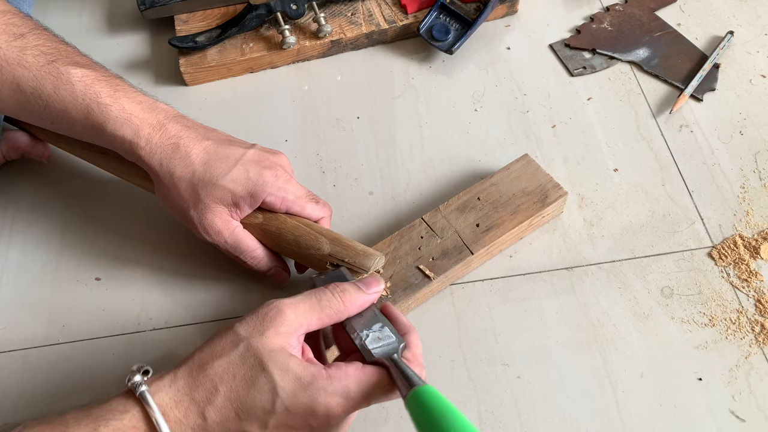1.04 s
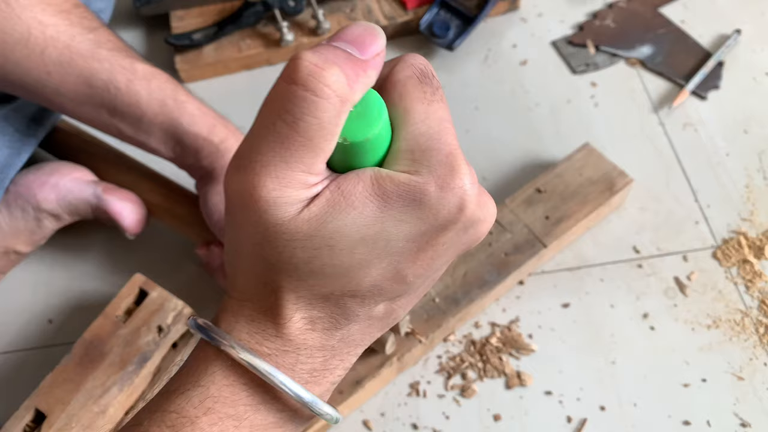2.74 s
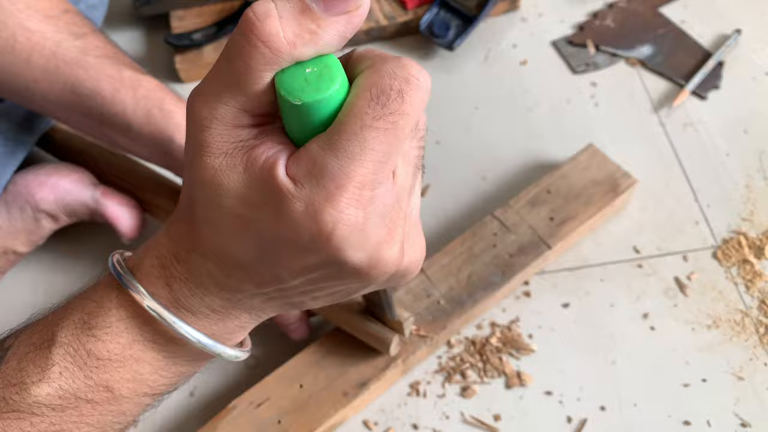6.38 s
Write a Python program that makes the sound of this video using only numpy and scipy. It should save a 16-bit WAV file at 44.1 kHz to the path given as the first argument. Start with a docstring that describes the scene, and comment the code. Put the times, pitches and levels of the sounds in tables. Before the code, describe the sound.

Light taps of a blade on wood lead to six crisp chisel cuts, with soft scraping and short high squeaks between them.

```python
"""A chisel cuts down through the edge of a wooden block on a board on a hard floor, in a small room.
First the edge ticks on the wood as it is set in place, over soft hiss and very faint chirping; a low
room noise comes up and the block rocks with a hollow knock. From 3.2 s come six cuts: a brief rush of
noise, a crack, the blade hitting the board, and a sharp second tick about 60 ms later. Between and after
the cuts the blade rubs, and a thin, rough whine comes and goes in snatches, with short high squeaks."""
import sys
import numpy as np
from scipy import signal
from scipy.fft import rfft, irfft
from scipy.io import wavfile
from scipy.ndimage import uniform_filter1d

SR = 44100
rng = np.random.default_rng(int(sys.argv[2]) if len(sys.argv) > 2 else 0)


def wav_out(sig):
    """Save sig, one row per channel (or a flat mono array), as 16-bit PCM at SR to the path in sys.argv[1]."""
    wavfile.write(sys.argv[1], SR, np.round(np.clip(np.atleast_2d(sig).T, -1, 1) * 32767).astype(np.int16))


N = 315756
TIME = np.arange(N) / SR
BRIEF = np.arange(-1024, 1024) / SR   # time axis centred on a transient [s]

# cue list of the cuts: (time [s], blow [dB], crack [dB], rush [dB], rush lead [s], 3 kHz bark [dB],
# 4 kHz splintering [dB], brittle treble [dB], thump [dB], rub [dB], wood ring [dB])
CUT_CUES = [(3.229, -6, -4, -31.5, 0.0036, -3, -0.5, -1, -47.5, -66.5, -34.5),
            (4.2034, -9, -7.5, -29, .0065, -14, -3.5, 6.5, -52, -77, -40),
            (4.8303, -9.5, -13.5, -28, 0.0041, 1.5, 2.5, 6.5, -67.5, -70.5, -38),
            (5.4783, -11, -12, -26, 0.0073, -2, 4.5, -2.5, -66, -53.5, -37.5),
            (6.078, -6, -7.5, -26, .0072, -4, -2.5, 4, -48, -53.5, -37),
            (6.5730, -8.5, -15, -29.5, 0.0074, 4, 3, 4.5, -69, -75.5, -38.5)]
# EQ of the rush of noise and of the crack after it: (frequency [Hz], level [dB])
RUSH_EQ = [(100, -36), (600, -16), (1300, 1), (2100, 2.5), (2900, 0.5), (5000, 3.5), (7900, -1), (9400, 6),
           (10700, -7), (12000, -4.5), (16000, -13)]
CRACK_EQ = [(300, -15.5), (1500, -5.5), (2200, -3), (2800, 3), (3900, -8.5), (5200, -5), (6100, -6),
            (7000, -9.5), (8700, -6), (10500, -20), (16000, -19.5)]
# modes of the chisel snapping free: (frequency [Hz], level [dB], t60 [s])
CHISEL_MODES = [(3200, -20.5, 0.012), (5140, -0.5, 0.0048), (6850, -0.5, 0.0061), (8400, -21.5, 0.012),
                (11400, -16.5, 0.015)]

def cuts(blow_hz, blow_s, crack_lead_s):
    """After a brief, bright rush of noise the wood cracks and jolts the chisel, which hits the board."""
    out = np.zeros(N)
    blow = -np.cos(2 * np.pi * blow_hz * BRIEF) * np.exp(-(BRIEF / blow_s) ** 2)
    for s, blow_db, crack_db, rush_db, rush_lead_s, bark_db, splinter_db, brittle_db, *_ in CUT_CUES:
        start = s + BRIEF[0]
        tone = [(1700, 0), (2900, bark_db), (4000, splinter_db), (6000, 0), (13000, brittle_db)]
        rush = colour(burst(RUSH_EQ, rise_s=0.0018, fall_s=0.0053, spread_db=4.0), tone)
        crack = colour(burst(CRACK_EQ, rise_s=0.00038, fall_s=0.00062), tone)
        jolt = touched(CHISEL_MODES, detune=0.004, uneven_db=4.0)
        add(out, start - rush_lead_s, from_db(rush_db + 0.5) * rush)
        add(out, start - crack_lead_s, from_db(crack_db - 2.5) * crack)
        add(out, s - crack_lead_s, from_db(crack_db - 4.5) * jolt)
        add(out, start, from_db(blow_db) * blow)
    return out


# modes of block and board: (frequency [Hz], level [dB], t60 before damping [s])
WOOD_MODES = [(229.5, -2, .14), (310, -0.5, .11), (346.3, 2.5, 0.13), (408.5, -2.5, 0.13), (550, -2, 0.17),
              (630, -5, 0.071), (691.4, 0, 0.17), (756, 3.5, 0.16), (829, 0, .16), (984, 1, 0.16),
              (1117, 0.5, .08), (1265, 7, 0.11), (1328, 5, .08), (1439, 1, 0.033), (1535, 4.5, .11),
              (1634, 4.5, .11), (1720, 5, 0.067), (1986, -2.5, .1), (2100, -5, .08), (2830, 1, .07),
              (3000, -1.5, 0.063), (5420, -3.5, .05)]

def wood_ring(uneven_db, t60_share):
    """Every blow rings the same modes in a new balance; the weight on the block damps them."""
    times, *_, ring_db = np.transpose(CUT_CUES)
    hits = np.round(times * SR).astype(int)
    out = np.zeros(N)
    for k, (hz, mode_db, t60) in enumerate(WOOD_MODES):
        force = np.zeros(N)
        force[hits] = from_db(ring_db + mode_db + uneven_db * rng.standard_normal(len(hits)))
        out += (-1) ** k * ring(force, hz, t60_share * t60)
    return out


def thumps(thump_s):
    """A very faint, deep thump under each cut."""
    out = np.zeros(N)
    for s, *_, thump_db, _, _ in CUT_CUES:
        add(out, s + BRIEF[0], -from_db(thump_db) * np.exp(-(BRIEF / thump_s) ** 2))
    return out


# what follows each blow: (delay [s], tick [dB], treble [dB], note [Hz], note [dB], crackle [dB])
SECOND_TICK_CUES = [(.0640, -34, -15.5, 3060, -42, -42), (.067, -37.5, -3, 8000, -55, -38),
                    (0.061, -43.5, -9, 7300, -59, -45.5), (.0600, -29.5, 7.5, 7000, -41, -56),
                    (.0575, -31.5, 7, 6900, -40.5, -56), (.0690, -39, 5, 14700, -42, -56)]
# EQ of the crackle and of the second tick: (frequency [Hz], level [dB])
CRACKLE_EQ = [(500, -25), (2000, -1.5), (5500, 0.5), (9500, -3.5), (16000, -10)]
SECOND_TICK_EQ = [(100, -37), (450, -8.5), (750, -15.5), (1300, -2), (2000, -5.5), (2700, -4), (4000, -7.5),
                  (5000, -3), (6000, -7.5), (7000, 1.5), (8000, -7), (14000, -16.5), (15400, -3)]

def second_ticks(snaps_per_s, crackle_fade_s, t60_s):
    """Each blow trails a short crackle; about 60 ms after it comes a sharp tick with a brief ring."""
    out, t = np.zeros(N), TIME[:SR // 8]
    for (s, *_), (delay_s, db, treble_db, hz, note_db, crackle_db) in zip(CUT_CUES, SECOND_TICK_CUES):
        snaps = rng.standard_normal(len(t)) * (rng.random(len(t)) < snaps_per_s / SR)
        crackle = rms_one(colour(snaps, CRACKLE_EQ)) * np.exp(-t / crackle_fade_s)
        tick = contact(SECOND_TICK_EQ, treble_db, graze_db=-29.5, rise_s=0.0003, fall_s=0.0058)
        note = narrow_noise(len(t), hz, width_hz=400) * from_db(-60 * t / t60_s)
        add(out, s, from_db(crackle_db) * crackle)
        add(out, s + delay_s + BRIEF[0], from_db(db) * tick)
        add(out, s + delay_s, from_db(note_db) * note)
    return out


# the block rocks on the board: (time [s], level [dB], hardness [dB/octave], attack [s])
KNOCK_CUES = [(2.0815, -30, 5, 0.0062), (3.2885, -30, 8, 0.013), (3.944, -47.5, -2.5, .004)]
# its hollow note, a beating pair with overtones: (frequency [Hz], level [dB], t60 [s])
HOLLOW_MODES = [(704, 3.5, 0.13), (719.6, 3, 0.07), (860, 6, 0.027), (1161, -12, 0.075), (1253, -14, .1),
                (1370, -14, 0.079), (1537, -20, 0.13), (2800, -31, 0.12), (3070, -25.5, 0.099)]

def knocks():
    """The block settles softly, so its note takes time to build; a harder knock is brighter."""
    out = np.zeros(N)
    root_hz = HOLLOW_MODES[0][0]
    for s, knock_db, hardness, attack_s in KNOCK_CUES:
        note = struck([(hz, db + hardness * np.log2(hz / root_hz), t60) for hz, db, t60 in HOLLOW_MODES])
        attack = 1 - np.exp(-TIME[:len(note)] / attack_s)
        add(out, s, from_db(knock_db) * note * attack)
    return out


# the edge touches the wood: (time [s], grit [dB], treble [dB], clink [dB], tap [dB], grit attack [s])
TICK_CUES = [(0.096, -53.5, -7, -83, -57.5, 0.0058), (.522, -30, -12, -48, -44.5, 0.00077),
             (0.675, -62, -6, -50, -83, 0.00091), (0.759, -53.5, 0, -69, -72, 0.0014),
             (0.814, -47, -18, -50.5, -64, 0.00082), (.997, -74, -12, -65, -71, .001),
             (1.063, -72, 5, -58, -83, 0.0011), (1.078, -47.5, -3.5, -47, -81, 0.0054),
             (1.082, -47.5, -1, -65, -76, 0.0014), (1.251, -51, 5, -46, -73, 0.0011),
             (1.272, -57, -4, -60, -78, .001), (1.577, -54.5, -15, -70, -64, 0.0014),
             (1.682, -45.5, 14, -81, -52, 0.0014), (1.937, -38.5, 17, -77, -48.5, 0.00029),
             (2.084, -44, -16, -50, -56, 0.0027), (2.395, -60, -12, -58, -75, .0019),
             (3.104, -49, 8.5, -59, -52.5, 0.0076), (4.007, -58.5, 8, -66, -76, 0.0011),
             (4.082, -56.5, 13.5, -73.5, -72, 0.0018), (4.426, -58, -7, -64.5, -70, 0.0031),
             (4.479, -54.5, 13, -79, -78, 0.0014), (4.5961, -32.5, 1, -73, -47.5, 0.0009),
             (4.647, -46, 8, -72, -62.5, 0.0014), (5.364, -33.5, 9, -55, -42, 0.002),
             (6.327, -60, -7.5, -64, -70, .002), (6.489, -32, 12.5, -55.5, -51, 0.0025),
             (6.539, -42, 13, -64, -59, 0.0014), (7.055, -44, 0, -64, -63, 0.0027),
             (7.065, -48, 2, -66, -64, 0.0027)]
# EQ of the grit: (frequency [Hz], level [dB])
GRIT_EQ = [(60, -46.5), (450, -3), (750, -1), (1200, 1), (1550, -1), (2100, 7), (3000, -7), (3900, 2),
           (4500, -3), (5600, 6), (8000, -11), (9500, 3), (11000, -10), (16000, -11.5)]
# modes of the woody tap and of the tool's clink: (frequency [Hz], level [dB], t60 [s])
TAP_MODES = [(774, -9, 0.052), (870, -8.5, 0.044), (1010, -5.5, 0.073), (1220, 2, 0.058), (1790, -5, 0.081),
             (1950, -6.5, 0.042), (2190, -1.5, 0.022), (3500, -8.5, .025), (4060, -5, .028),
             (5500, -1.5, 0.015), (6170, 1, 0.02), (8800, 1.5, .014)]
CLINK_MODES = [(3290, -4, 0.033), (3476, 6.5, .03), (3900, -3, .022), (4280, -4, 0.029), (4700, -3, 0.021),
               (5960, -1.5, 0.036), (6200, -16.5, .022), (6700, -4.5, 0.036), (7900, -14.5, 0.042)]

def ticks(delay_s, tap_trim_db, clink_trim_db, bounce_s, bounce_loss_db):
    """Each gritty touch taps the wood, and the tool chatters in three ever weaker bounces."""
    out = np.zeros(N)
    for cue_s, grit_db, treble_db, clink_db, tap_db, rise_s in TICK_CUES:
        s = cue_s + delay_s
        grit = contact(GRIT_EQ, treble_db, graze_db=-18.5, rise_s=rise_s, fall_s=0.0021)
        tap = touched(TAP_MODES, detune=0.021, uneven_db=1.5)
        add(out, s + BRIEF[0], from_db(grit_db) * grit)
        add(out, s, from_db(tap_db + tap_trim_db) * tap)
        for bounce in range(3):
            at_s = s + bounce_s * np.sqrt(bounce) * rng.uniform(.7, 1.3)
            clink = touched(CLINK_MODES, detune=.022, uneven_db=3.0)
            add(out, at_s, from_db(clink_db + clink_trim_db - bounce_loss_db * bounce) * clink)
    return out


# the blade slides over the wood: (time [s], length [s], level [dB])
SLIDE_CUES = [(1.825, 0.41, -82), (3.149, 0.019, -60), (4.743, 0.029, -67.5), (4.977, 0.04, -62),
              (5.147, 0.11, -62), (5.278, 0.013, -64), (5.315, 0.05, -66), (6.669, 0.17, -73.5),
              (6.954, 0.21, -64.5)]
# EQ of the friction: (frequency [Hz], level [dB])
RUB_EQ = [(1200, -19), (2200, -2), (3500, -2.5), (5500, -3), (8000, -6.5), (9600, -4), (11000, -11),
          (16000, -16.5)]

def rubbing(resting_db, push_s, let_go_s, slips_per_s, t60_s):
    """Clumps of tiny pitched slips swell as the hand leans into a cut and when the blade slides."""
    pushes = sum(from_db(db) * around(s, push_s, let_go_s) for s, *_, db, _ in CUT_CUES)
    friction = from_db(resting_db) + pushes
    for s, length_s, db in SLIDE_CUES:
        add(friction, s, from_db(db) * swell(round(length_s * SR), length_s / 2))
    slipping = rng.random(N) < slips_per_s * flutter(depth_db=5, rate_hz=40) / SR
    slips = slipping * rng.choice([-1, 1], N) * uneven_gains(N, spread_db=3)
    pitches = np.linspace(1800, 15500, 32)
    voice = rng.integers(0, len(pitches), N)
    grit = sum(ring(slips * (voice == k), hz, t60_s) * flutter(depth_db=4, rate_hz=25)
               for k, hz in enumerate(pitches))
    return friction * rms_one(colour(flatten(grit, bins=6000), RUB_EQ))


# spells of the whine: (time [s], length [s], level [dB])
WHINE_CUES = [(2.754, .1, -71), (2.884, 0.36, -71.5), (5.162, 0.15, -70.5), (5.528, 0.49, -63.5),
              (6.112, 0.208, -63), (6.397, 0.55, -70.5)]
# its narrow noise bands: (frequency [Hz], width [Hz], level [dB])
WHINE_BANDS = [(2770, 70, -4), (3095, 70, -6.5), (3350, 70, -7), (3714, 55, -6), (4027, 50, -8),
               (4220, 80, -6), (5000, 90, -8), (5520, 90, -5), (6724, 90, -13)]

def whine(bands_db, rasp_db, rasp_width_hz, fade_s):
    """A thin, rough whine comes and goes in snatches over a patchy rasp."""
    envelope = np.zeros(N)
    for s, length_s, db in WHINE_CUES:
        add(envelope, s, from_db(db) * swell(round(length_s * SR), fade_s))
    bands = sum(from_db(db) * narrow_noise(N, hz, width_hz) * flutter(depth_db=7, rate_hz=30)
                for hz, width_hz, db in WHINE_BANDS)
    rasp = sum(narrow_noise(N, hz, rasp_width_hz) * flutter(depth_db=6, rate_hz=25)
               for hz in np.geomspace(2500, 6200, 14))
    flicker = flutter(depth_db=3.5, rate_hz=35)
    return envelope * flicker * (from_db(bands_db) * rms_one(bands) + from_db(rasp_db) * rms_one(rasp))


# short high squeaks: (time [s], length [s], pitch [Hz], level [dB])
SQUEAK_CUES = [(2.77, .07, 4200, -65), (2.77, .075, 5600, -69), (3.04, .04, 3730, -71),
               (4.015, .04, 5080, -68), (4.27, .11, 3780, -67), (4.656, .13, 3720, -73),
               (5.405, .08, 4200, -54), (5.62, .055, 4230, -62), (5.68, .04, 4250, -57),
               (5.725, .075, 4200, -61), (5.81, .05, 4180, -53), (5.85, .06, 4190, -52),
               (5.97, .03, 4195, -62), (6.005, .035, 4190, -64), (6.2, .08, 4270, -66),
               (6.66, .06, 4300, -65), (6.755, .04, 4600, -65), (6.99, .05, 5080, -63),
               (7.045, .05, 5100, -61), (7.095, .04, 4980, -60)]

def squeaks(beat_hz, neighbour_share, hiss_share):
    """Two close partials beat as a rough, pulsing tone inside a narrow hiss."""
    out = np.zeros(N)
    mix = np.array([1, neighbour_share, hiss_share])
    for s, length_s, hz, db in SQUEAK_CUES:
        size = round(length_s * SR)
        main = squeal(size, hz, waver_hz=35, rough_db=4)
        neighbour = squeal(size, hz + beat_hz, waver_hz=35, rough_db=4)
        hiss = narrow_noise(size, hz, width_hz=500) * swell(size, length_s / 2)
        add(out, s, from_db(db) * (mix @ [main, neighbour, hiss]) / np.linalg.norm(mix))
    return out


def fibres(from_s, snaps_per_s, floor_db, t60_s):
    """Once the blade is in the wood, tiny fibres give way in clumps of pitched snaps."""
    snapping = rng.random(N) < snaps_per_s * flutter(depth_db=7, rate_hz=12) / SR
    snaps = snapping * (TIME > from_s) * from_db(floor_db) * uneven_gains(N, spread_db=6)
    pitches = np.geomspace(3000, 10500, 24)
    voice = rng.integers(0, len(pitches), N)
    return sum(ring(snaps * (voice == k), hz, t60_s) for k, hz in enumerate(pitches))


# dry, high swishes: (time [s], length [s], centre [Hz], level [dB])
SWISH_CUES = [(1.753, 0.1, 13500, -73), (1.837, 0.51, 8960, -78.5), (2.45, .06, 7500, -74),
              (3.52, .05, 8300, -73), (5.136, 0.14, 9250, -68), (6.718, 0.027, 9170, -65)]

def swishes(width_hz):
    """The wood shifts in the hand; the light friction gives a narrow, unsteady hiss."""
    out = np.zeros(N)
    for s, length_s, hz, db in SWISH_CUES:
        size = round(length_s * SR)
        add(out, s, from_db(db) * narrow_noise(size, hz, width_hz) * swell(size, length_s / 2))
    return out * flutter(depth_db=3.5, rate_hz=40)


# background chirps: (time [s], length [s], pitch [Hz], sweep [Hz], level [dB])
CHIRP_CUES = [(0, .04, 3050, 250, -70), (.05, .07, 3130, 0, -72), (.13, .09, 3150, 100, -72),
              (.22, .06, 3000, -300, -73), (.33, .15, 2770, 0, -73), (.635, .05, 2950, 150, -70),
              (.71, .05, 2970, 0, -70), (.82, .07, 2980, 150, -72), (2.395, .04, 2880, 350, -67),
              (2.44, .09, 3280, 0, -73), (2.55, .06, 2980, 300, -66), (2.67, .05, 2950, 250, -69),
              (2.725, .05, 3050, 150, -71), (2.91, .06, 2800, 0, -70), (2.97, .035, 2980, 0, -68)]

def chirps(trim_db, blur_t60_s):
    """Faint short notes, level or swept, blurred by distance."""
    out = np.zeros(N)
    for s, length_s, hz, sweep_hz, db in CHIRP_CUES:
        glide = np.linspace(-.5, .5, round(length_s * SR))
        note = squeal(len(glide), hz + sweep_hz * glide, waver_hz=70, rough_db=4)
        add(out, s, from_db(db + trim_db) * note)
    t = TIME[:SR // 4]
    blur = flatten(rng.standard_normal(len(t)) * from_db(-60 * t / blur_t60_s), bins=40)
    return signal.fftconvolve(out, blur)[:N]


# EQ of the reflections: (frequency [Hz], level against the direct sound [dB])
REVERB_EQ = [(100, -25.5), (300, -12), (900, 5.5), (1600, -6), (3000, -6), (7000, -7), (11000, -3.5),
             (16000, -3)]

def room_reverb(dry, early_t60_s, late_t60_s, late_db, dull_hz):
    """Near walls and floor answer with a dense short tail; a faint, longer, duller one follows."""
    t = TIME[:SR // 2]
    early = stereo_noise(len(t), side_db=-7) * from_db(-60 * t / early_t60_s)
    late = stereo_noise(len(t), side_db=-4) * from_db(late_db - 60 * t / late_t60_s)
    late = signal.sosfilt(signal.butter(1, dull_hz, fs=SR, output="sos"), late)
    fade_out = np.cos(np.pi / 2 * t / t[-1]) ** 2
    tail = colour(flatten(early + late, bins=200), REVERB_EQ) * fade_out
    echoes = np.pad(tail, [(0, 0), (round(.0018 * SR), 0)])   # pre-delay of the nearest surface
    return dry + signal.fftconvolve(dry[None], echoes, axes=1)[:, :N]


# EQ of the room tone's rumble, droning resonances and hiss: (frequency [Hz], level [dB])
RUMBLE_EQ = [(30, -50), (60, -35.5), (120, -25), (170, -15.5), (215, -2), (285, 2.5), (350, -7), (430, -13),
             (520, -23), (2000, -76.5)]
DRONE_EQ = [(250, -64), (370, -5.5), (412, -6), (485, -21), (542, -2.5), (595, -18), (700, -7.5),
            (790, -18.5), (2000, -71.5)]
HISS_EQ = [(300, -29.5), (580, -18.5), (700, 3), (800, -2), (1300, -0.5), (2000, -1.5), (2400, -10.5),
           (4000, -13), (8500, -20.5), (11000, -27.5), (16000, -28.5)]

def room_tone(up_at_s, up_over_s, heave_db, hiss_db):
    """Under a steady hiss, rumble and room resonances come up early and swell around each cut."""
    up = np.clip((TIME - up_at_s) / up_over_s + .5, 0, 1)
    lift_db = heave_db * sum(around(s, rise_s=0.23, fall_s=0.2) for s, *_ in CUT_CUES)
    rumble_db = np.interp(up, [0, 1], [-66.5, -60.5]) + lift_db
    drone_db = np.interp(up, [0, 1], [-85.5, -66]) + 0.95 * lift_db
    rumble = rms_one(colour(stereo_noise(N, side_db=-4), RUMBLE_EQ))
    drone = rms_one(colour(stereo_noise(N, side_db=-15.5), DRONE_EQ))
    hiss = rms_one(colour(stereo_noise(N, side_db=-4), HISS_EQ))
    return from_db(rumble_db) * rumble + from_db(drone_db) * drone + from_db(hiss_db) * hiss


def burst(eq, rise_s, fall_s, spread_db=2.5):
    """A grainy burst of noise that peaks at about unit power in the middle of BRIEF."""
    envelope = np.exp(-np.abs(BRIEF) / np.where(BRIEF < 0, rise_s, fall_s))
    grains = rms_one(rng.standard_normal(len(BRIEF)) * uneven_gains(len(BRIEF), spread_db))
    crackle = flatten(grains * envelope, bins=36)
    return rms_one(colour(crackle, eq)) * np.sqrt(np.mean(envelope ** 2))


def contact(eq, treble_db, graze_db, rise_s, fall_s):
    """A small gritty contact inside a softer graze, with its own brightness."""
    shelf = [(1300, 0), (11000, treble_db)]
    tilted = [(hz, db + at_hz(shelf, hz)[0]) for hz, db in eq]
    return burst(tilted, rise_s, fall_s) + from_db(graze_db) * burst(tilted, rise_s=.0038, fall_s=.0041)


def struck(modes):
    """An eighth of a second of free ringing after one touch."""
    t = TIME[:SR // 8]
    return sum(from_db(db - 60 * t / t60) * np.sin(2 * np.pi * hz * t) for hz, db, t60 in modes)


def touched(modes, detune, uneven_db):
    """Free ringing, with each mode shifted a little by the grip and the point of contact."""
    chance = rng.standard_normal((len(modes), 2))
    return struck([(hz * (1 + detune * a), db + uneven_db * b, t60)
                   for (hz, db, t60), (a, b) in zip(modes, chance)])


def ring(force, hz, t60):
    """A resonator: a unit click sets a sine of height 1 ringing."""
    r, w = from_db(-60 / (t60 * SR)), 2 * np.pi * hz / SR
    return signal.lfilter([0, np.sin(w)], [1, -2 * r * np.cos(w), r * r], force + 1e-18)


def squeal(size, hz, waver_hz, rough_db):
    """A tone that swells and fades, unsteady in pitch and strength."""
    knots = rng.standard_normal((2, 200))
    waver, rough = [np.interp(TIME[:size] * 150, np.arange(len(k)), k) for k in knots]
    tone = np.sin(2 * np.pi * np.cumsum(hz + waver_hz * waver) / SR) * from_db(rough_db * rough)
    return rms_one(tone) * np.sin(np.linspace(0, np.pi, size))


def narrow_noise(size, hz, width_hz):
    """Noise through one narrow resonance; unit power."""
    return rms_one(ring(rng.standard_normal(size), hz, t60=np.log(1000) / (np.pi * width_hz)))


def stereo_noise(size, side_db):
    """White noise that is mostly common to both channels."""
    mid, side = rng.standard_normal((2, size))
    return rms_one(mid + from_db(side_db) * side * [[1], [-1]])


def uneven_gains(size, spread_db):
    """Random boosts, most small and a few large."""
    return from_db(spread_db * np.minimum(rng.exponential(1, size), 4))


def flutter(depth_db, rate_hz):
    """A gain that wanders at random."""
    knots = rng.standard_normal(2000)
    return from_db(depth_db * np.interp(TIME * rate_hz, np.arange(len(knots)), knots))


def swell(size, edge_s):
    """Attack, hold and release, with equal edges."""
    t = TIME[:size]
    return np.sin(np.pi / 2 * np.clip(np.minimum(t, t[-1] - t) / edge_s, 0, 1))


def around(s, rise_s, fall_s):
    """A gain that grows to 1 at time s and dies away after it."""
    return np.exp(-np.abs(TIME - s) / np.where(TIME < s, rise_s, fall_s))


def flatten(x, bins):
    """Level the broad humps of a noise spectrum and keep its fine ripple; unit energy."""
    spectrum = rfft(x)
    return irfft(spectrum / np.sqrt(uniform_filter1d(np.abs(spectrum) ** 2, bins) + 1e-20), x.shape[-1])


def colour(x, eq):
    """Apply an EQ curve."""
    size = x.shape[-1]
    gain = from_db(at_hz(eq, np.fft.rfftfreq(size, 1 / SR))[0])
    return irfft(rfft(x) * gain, size)


def at_hz(points, hz):
    """Each column of a curve, read on a log-frequency axis."""
    knots, *columns = np.transpose(points)
    return [np.interp(np.log(hz + 1), np.log(knots), c) for c in columns]


def add(out, s, sound):
    """Mix a sound in from time s on."""
    start = max(round(s * SR), 0)
    out[start:start + len(sound)] += sound[:N - start]


def from_db(db):
    """Decibels to gain."""
    return 10 ** (np.asarray(db) / 20)


def rms_one(x):
    """Scale to unit power."""
    return x / np.sqrt(np.mean(x ** 2) + 1e-20)


def scene():
    """The mix: all the work happens at one spot, with the room around it."""
    work = cuts(blow_hz=1605, blow_s=0.00056, crack_lead_s=.0006)
    work += ticks(delay_s=0.0014, tap_trim_db=-0.5, clink_trim_db=-3, bounce_s=0.0019, bounce_loss_db=6)
    work += fibres(from_s=2.7, snaps_per_s=67, floor_db=-75, t60_s=.006)
    work += second_ticks(snaps_per_s=1200, crackle_fade_s=.028, t60_s=0.053)
    work += rubbing(resting_db=-78.5, push_s=0.072, let_go_s=0.03, slips_per_s=6000, t60_s=.005)
    work += whine(bands_db=2, rasp_db=-11, rasp_width_hz=50, fade_s=0.11)
    work += squeaks(beat_hz=70, neighbour_share=.6, hiss_share=.7)
    work += swishes(width_hz=360)
    work += chirps(trim_db=0.5, blur_t60_s=.16)
    work = room_reverb(work, early_t60_s=0.095, late_t60_s=0.44, late_db=-34, dull_hz=3500)
    work += wood_ring(uneven_db=2, t60_share=0.88) + knocks()
    # the work and its room carry no deep bass; only the thumps added below reach beneath
    work = signal.sosfilt(signal.butter(5, 151, "high", fs=SR, output="sos"), work)
    work += thumps(thump_s=.003)
    return work + room_tone(up_at_s=1.49, up_over_s=0.3, heave_db=5, hiss_db=-63.5)


# stereo image of the two microphone ports: (frequency [Hz], left lead [rad], left minus right [dB])
MIC_PORTS = [(30, 0.55, -4), (253, .95, 0), (1200, 0.92, .5), (3200, 1.0, .5), (6000, 1.2, 0),
             (9500, 1.35, -1), (13000, 2.0, .5), (16000, 2.3, 0.5)]

def record(dry):
    """The two ports differ in phase and level; the deep bass and the top are cut."""
    lead, balance_db = at_hz(MIC_PORTS, np.fft.rfftfreq(N, 1 / SR))
    side = np.array([[.5], [-.5]])
    ports = irfft(rfft(dry) * from_db(side * balance_db) * np.exp(1j * side * lead), N)
    ports = signal.sosfilt(signal.butter(1, 95, "high", fs=SR, output="sos"), ports)
    return signal.sosfilt(signal.ellip(10, .1, 80, 16000, fs=SR, output="sos"), ports)


dry = scene()
out = record(dry)
wav_out(out)
```